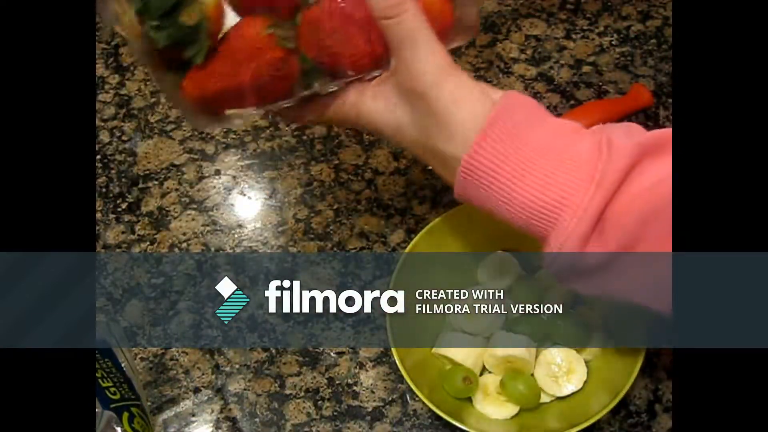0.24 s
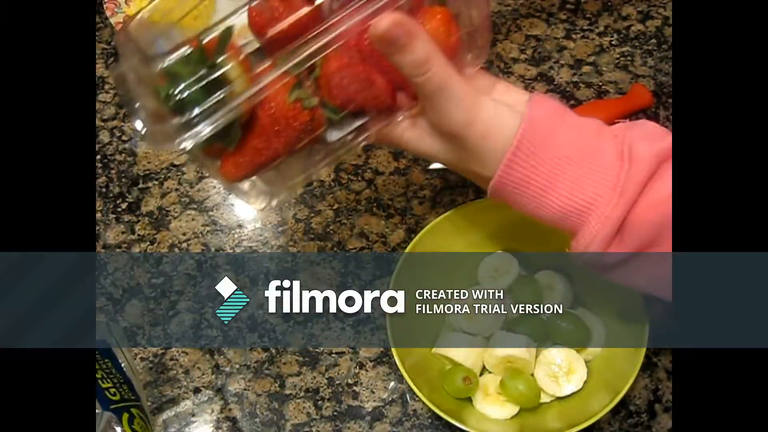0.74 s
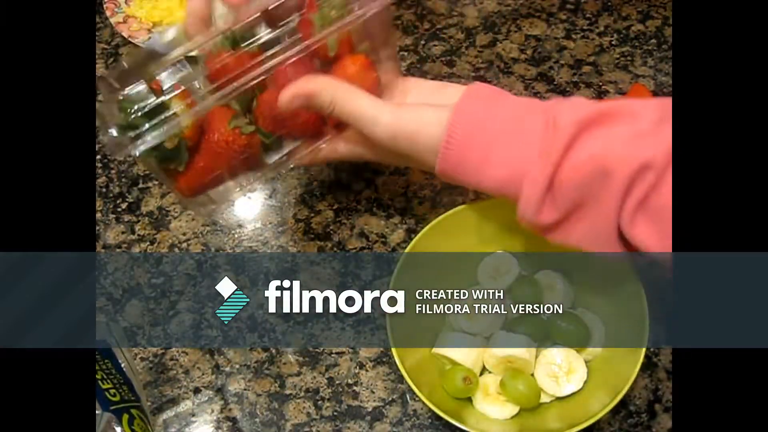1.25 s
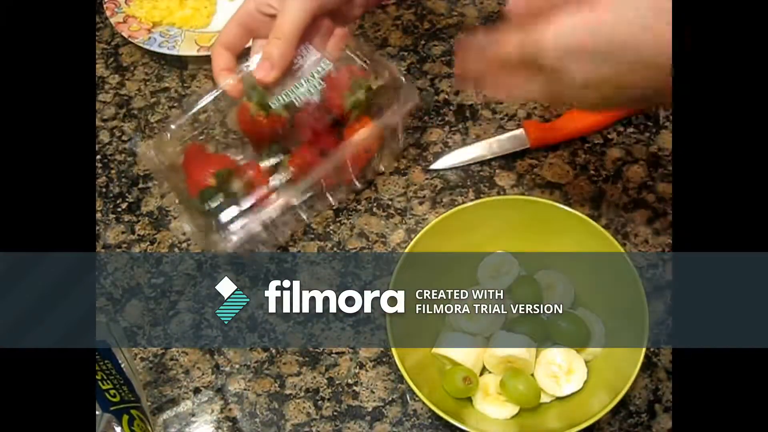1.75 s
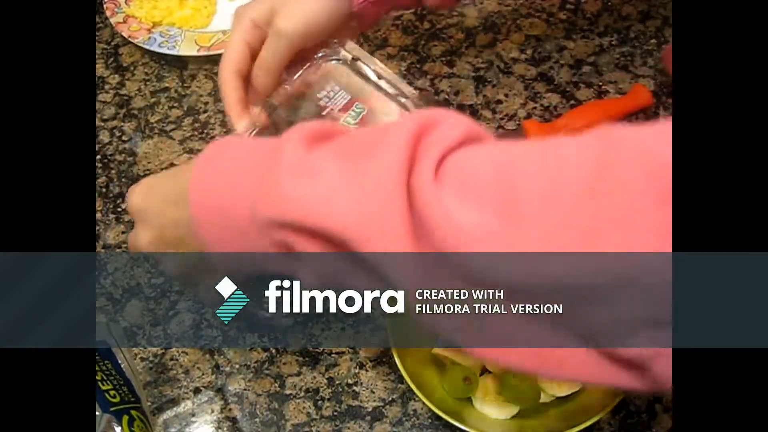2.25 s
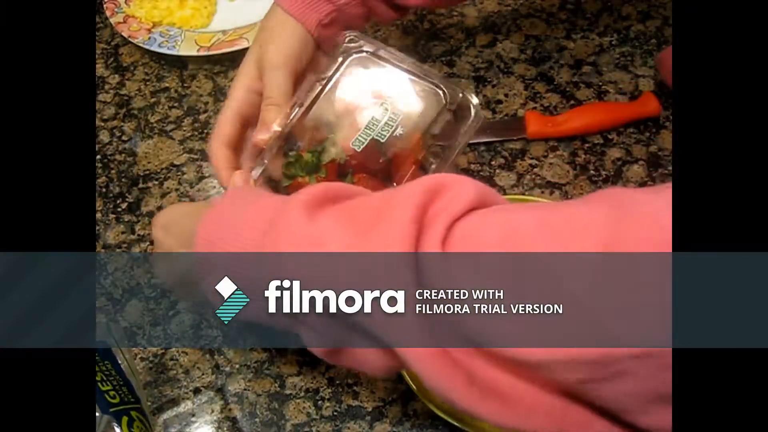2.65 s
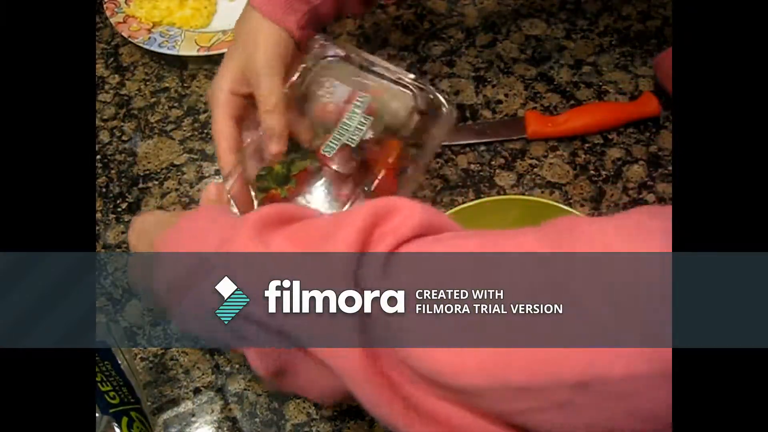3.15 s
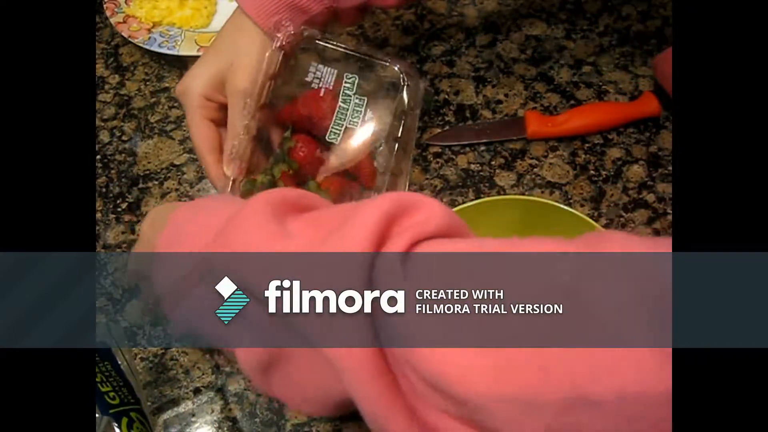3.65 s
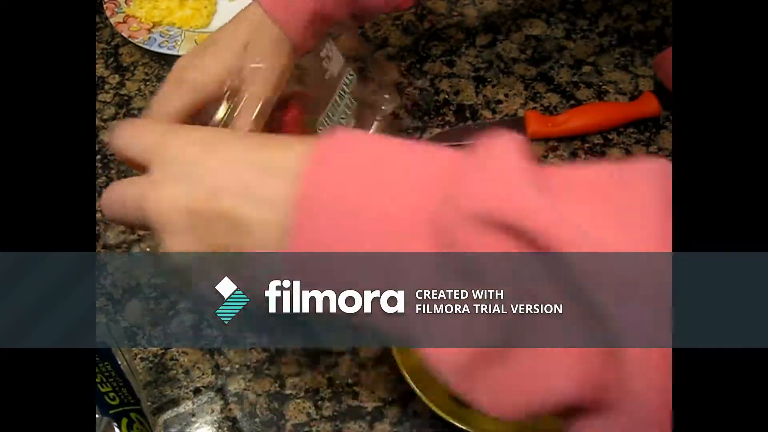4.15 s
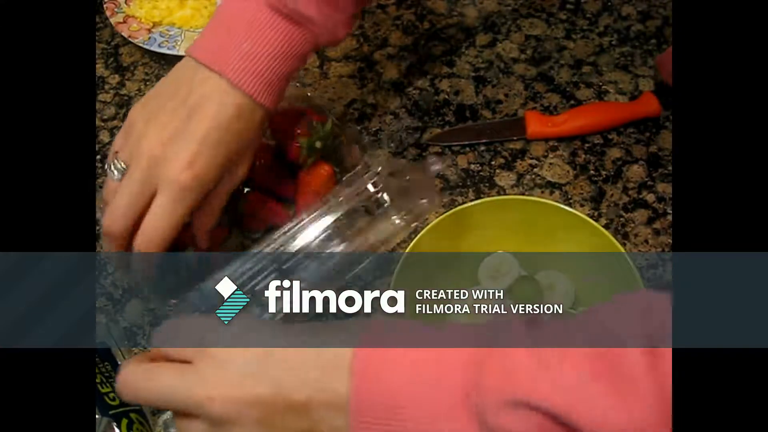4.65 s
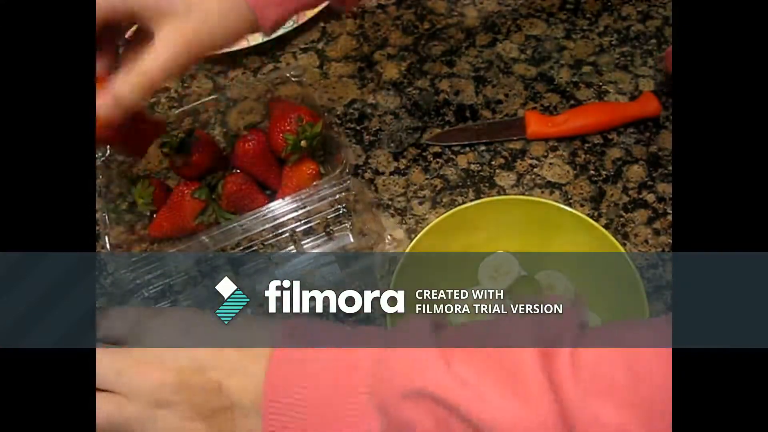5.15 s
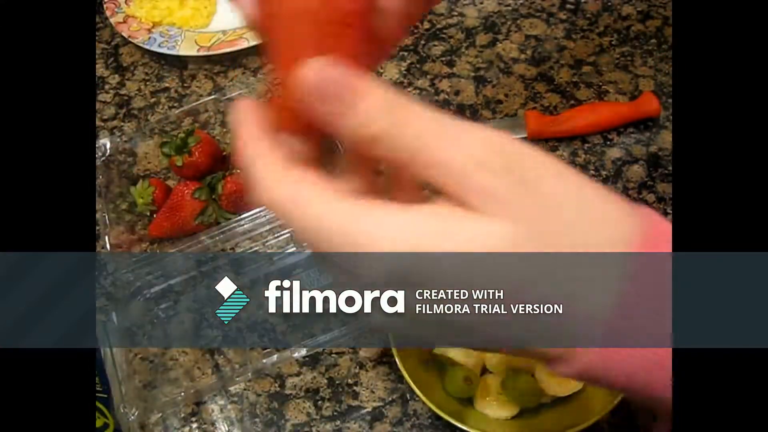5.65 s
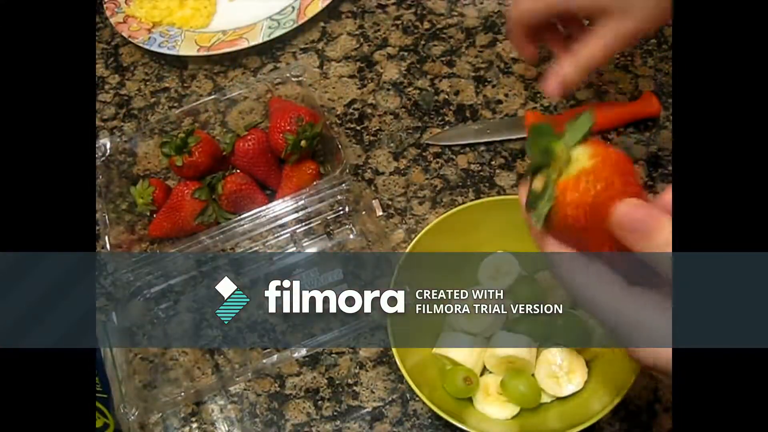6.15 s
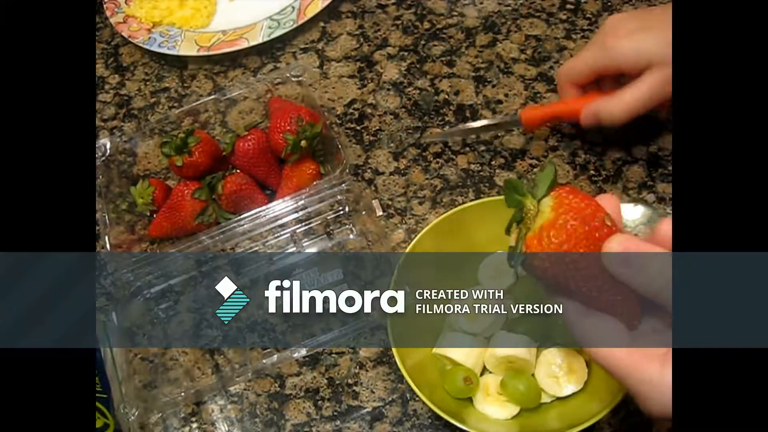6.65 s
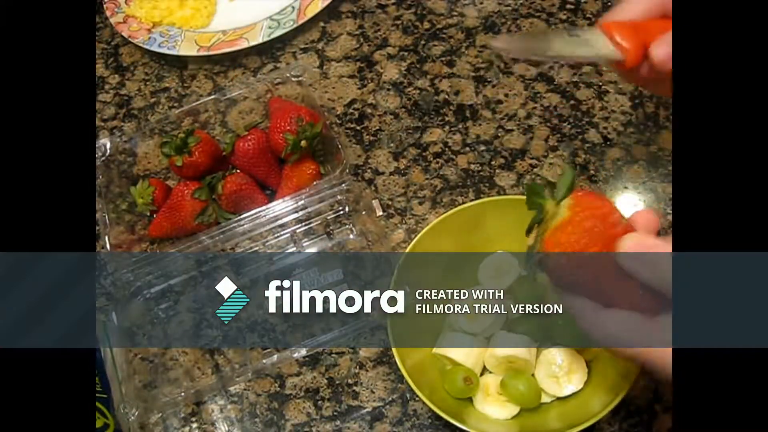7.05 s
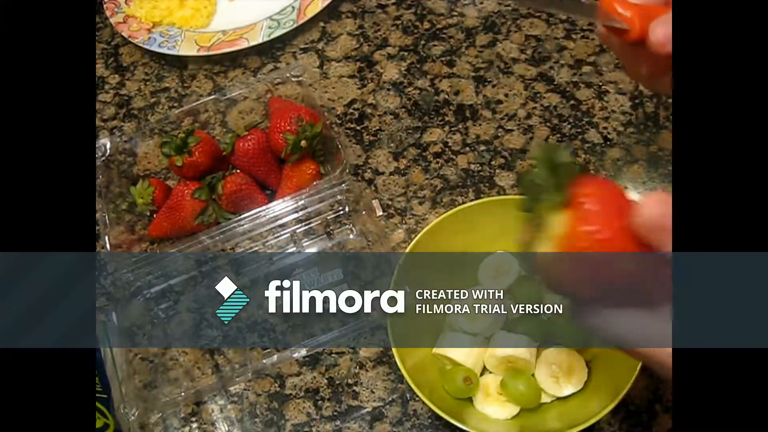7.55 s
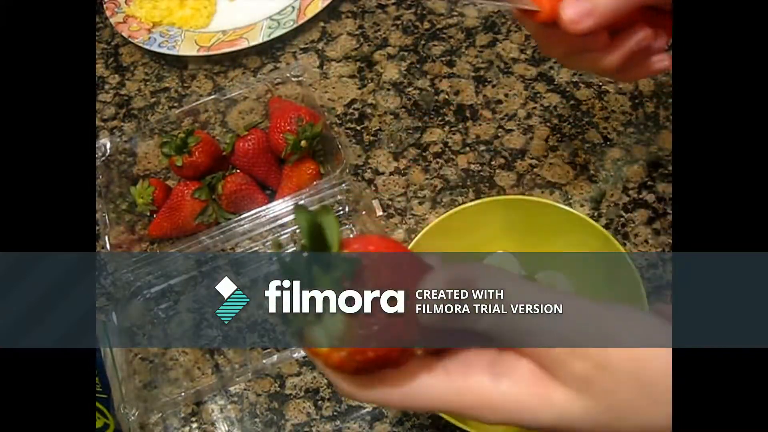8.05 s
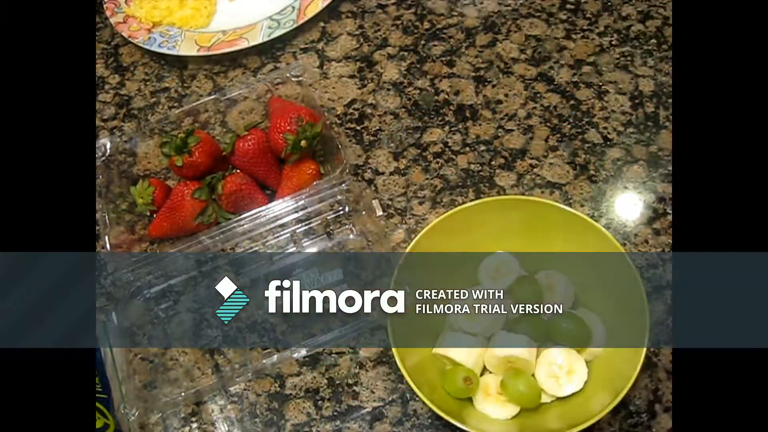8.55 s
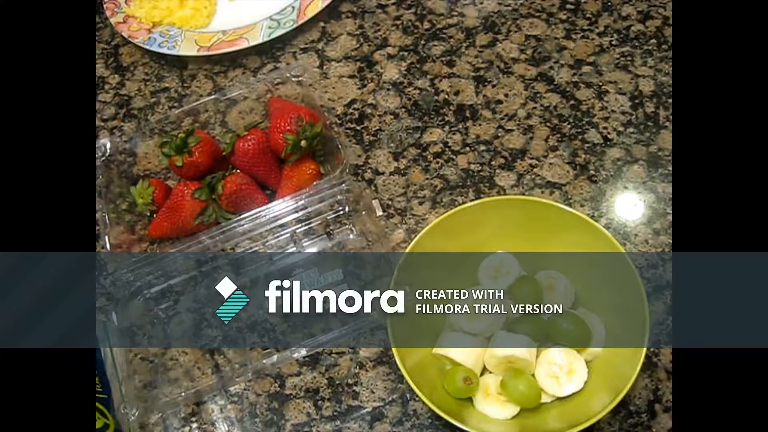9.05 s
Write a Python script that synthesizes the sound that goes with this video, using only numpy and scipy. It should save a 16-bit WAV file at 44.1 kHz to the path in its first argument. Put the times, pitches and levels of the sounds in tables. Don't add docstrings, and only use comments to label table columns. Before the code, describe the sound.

Hands work a brittle plastic fruit container: scattered sharp cracks, a short lull, then dense crunching, creaks and skin rasp building to the loudest pops as it opens. Lighter crackling fades, something hollow knocks on stone, a knife clicks, a sleeve brushes. Close, dry recording in a kitchen with soft room noise, slight hiss and thin motor whine.

```python
import sys
import numpy as np
from scipy import signal
from scipy.fft import rfft, irfft, next_fast_len
from scipy.io import wavfile
from scipy.ndimage import uniform_filter1d, map_coordinates

SR = 44100
rng = np.random.default_rng(int(sys.argv[2]) if len(sys.argv) > 2 else 0)


def ratio_of_db(decibels):
    return 10 ** (np.asarray(decibels, float) / 20)


def put_to_file(sound):
    columns = np.atleast_2d(sound).T
    safe = np.clip(columns, -1, 1)
    whole_steps = np.round(safe * 32767)
    wavfile.write(sys.argv[1], SR, whole_steps.astype(np.int16))


N = 410120


def unit(x):
    return x / np.sqrt(np.mean(x ** 2, axis=-1, keepdims=True) + 1e-20)


def along(points, hz):
    f, v = np.transpose(points)
    return np.interp(np.log(hz + 1), np.log(f + 1), v)


def curves(rows):
    s, *columns = np.transpose(rows)
    return [np.interp(np.arange(N) / SR, s, column) for column in columns]


def wobble(rate):
    knots = rng.standard_normal(int(N * rate / SR) + 4)
    return map_coordinates(knots, [np.arange(N) * rate / SR])


def filtered(x, response):
    size = next_fast_len(x.shape[-1] + 4096)
    spectrum = rfft(x, size) * response(np.fft.rfftfreq(size, 1 / SR))
    return irfft(spectrum, size)[..., :x.shape[-1]]


def coloured(x, spectrum):
    return unit(filtered(x, lambda hz: ratio_of_db(along(spectrum, hz))))


def patchy(patchy_db, bins, frames):
    z = signal.stft(rng.standard_normal(N), nperseg=256)[2]
    field = uniform_filter1d(rng.standard_normal(z.shape), size=bins, axis=0)
    field = uniform_filter1d(field, size=frames, axis=1)
    return signal.istft(z * ratio_of_db(patchy_db * field / field.std()), nperseg=256)[1][:N]


def placed(times, rows):
    at = np.round(np.asarray(times) * SR).astype(int)[:, None] + np.arange(rows.shape[1])
    return np.bincount(at.ravel(), rows.ravel(), N + rows.shape[1])[:N]


# pitch_hz, level_db (per Hz)
AIR = [(12, -40), (20, -14), (71, -8.5), (152, -2.5), (262, 1.5), (312, -3.5), (441, 0), (688, -6),
       (1720, -13), (5360, -19.5), (7400, -19), (9620, -43), (16300, -120)]
HISS = [(4880, -36), (8300, -7), (10100, 3.5), (15100, -8), (15900, -4.5)]
# time_s, level_db, pitch_hz
WHINE = [(0, -63.5, 5265), (3, -63.5, 5265), (5.2, -64, 5260), (6.3, -63, 5270), (6.78, -63, 5262),
         (6.84, -73, 5300), (7.3, -72, 5290), (7.5, -67, 5265), (7.78, -62.5, 5265), (9.3, -61.5, 5264)]
# pitch_ratio (multiple of the whine), level_db (rel)
PARTIALS = [(1, 0), (.3288, -9), (.5316, -12), (.924, -11), (.9745, -13), (1.043, -14)]
# pitch_hz, level_db
HUM = [(143, -68), (269, -70)]


def kitchen():
    def line(hz, db, drift_hz):
        phase = 2 * np.pi * np.cumsum(hz + drift_hz * wobble(16)) / SR
        return ratio_of_db(db + 5.5) * np.sin(phase)

    motor_db, motor_hz = curves(WHINE)
    whine = sum(line(k * motor_hz, motor_db + db + 1.5 * wobble(30), 2) for k, db in PARTIALS)
    hum = sum(line(hz, db + 2.5 * wobble(4), 9) for hz, db in HUM)
    air = ratio_of_db(-50.5 + 0.15 * wobble(2.4)) * coloured(patchy(0.79, bins=3, frames=20), AIR)
    hiss = ratio_of_db(-61.5 + 1.1 * wobble(4.6)) * coloured(rng.standard_normal(N), HISS)
    return air + hiss + whine + hum


def slips(rate, spread_db, t60):
    starts = (rng.random(N) < rate / SR) * ratio_of_db(2 * spread_db * rng.exponential(size=N))
    power = signal.lfilter([1], [1, -ratio_of_db(-120 / (t60 * SR))], starts)
    return np.sqrt(power / np.mean(starts) / (t60 * SR) * 14 + 0.88)


def pricks(strength, rate, spread_db):
    draw = rng.random((int(rate * N / SR), 3))
    s = draw[:, 0] * (N - 1) / SR
    size = -np.log(1 - draw[:, 1:2])
    hz = 2000 * 6 ** draw[:, 2:] ** 1.49
    t = np.arange(256) / SR
    ticks = ratio_of_db(spread_db * np.minimum(size, 3)) * np.sin(2 * np.pi * hz * t) * np.exp(-t * hz / 3.4)
    return placed(s, strength[(s * SR).astype(int), None] * ticks)


def strokes(table, rise, roundness, t):
    panel_under_db, panel_grows = -4.5, 1.4
    s, db, fall, body_db, fizz_db = np.transpose(table)
    late = (t - s[:, None]) / np.abs(fall[:, None])
    shape = ratio_of_db(-20 * np.maximum(late, -late / rise) ** roundness)
    parts_db = db + [panel_under_db + panel_grows * body_db, body_db, 0 * db, fizz_db]
    return ratio_of_db(2 * parts_db) @ shape


# pitch_hz, level_db (per Hz)
PANEL = [(90, -90), (170, -38), (400, -6.5), (800, -5), (1100, 1.5), (1500, 0), (1950, -19), (3300, -120)]
WALL = [(900, -13), (1450, -14), (1750, -5.5), (1880, -6.5), (2020, -4.5), (2200, -6), (2380, -6),
        (3000, -10.5), (3900, -23.5), (6600, -120)]
RASP = [(1200, -79), (2500, -10), (3000, -9.5), (3350, -6.5), (4700, -8), (5450, -8), (7400, -13),
        (9600, -27), (16300, -120)]
FIZZ = [(7000, -32), (8000, 5.5), (10000, 6.5), (12500, 4.5), (15500, 3.5), (17200, -47), (18000, -58.5)]
# peak_s, rasp_db, fall_s (per 10 dB), body_db (rel), fizz_db (rel)
JERKS = [(0.385, -43.5, 0.08, 0, -2.5), (0.6, -45, 0.43, -4, -14), (0.666, -43, 0.24, -0.5, -4.5),
         (1.615, -38, 0.09, 0.5, -6.5), (1.795, -38, 0.45, -7, -6), (2.442, -36, 0.17, -3, -4.5),
         (2.552, -35.5, 0.05, -3, -4.5), (2.634, -46, 0.1, 6.5, -12), (2.806, -41, 0.14, -7, -2),
         (3.235, -33, 0.21, -6, -9), (3.299, -38, 0.26, 1, -0.5), (3.542, -55, 1, 2.5, -8),
         (3.652, -35, 0.04, -11, 2.5), (3.757, -34.5, 0.14, -1, -8), (4.462, -33.5, 0.34, -8.5, -6.5),
         (5.314, -49.5, 0.15, 1, -5), (6.551, -55.5, 0.4, -9, -9), (7.575, -51.5, 0.18, -0.5, -5),
         (7.94, -58.5, -0.05, -6, 7.5), (8.325, -58.5, 0.5, 2, -5.5), (8.91, -55, 0.05, 3, -5)]
SWEEPS = [(0.132, -50, 1, 2, -3.5), (0.99, -35.5, -0.025, -2.5, -3), (1.178, -44, 0.02, 3.5, -8),
          (1.9, -47.5, 1, -10, -10), (1.39, -45, 0.14, -3.5, -2.5), (1.96, -38, 0.03, -7.5, 0.5),
          (2.255, -37, 0.15, -1.3, -8), (2.14, -50.5, 0.27, 2, -18), (2.36, -36, 0, -13, -4),
          (2.95, -38, 0.05, -5.5, -2), (3.434, -51, 0.37, 1.5, -22), (3.885, -32.5, 0.1977, 1, -12),
          (4.168, -23.5, 0.1147, -8, -16), (4.81, -35.5, 0.2771, -7.5, -5.5), (4.95, -40, 0, -6, -3),
          (5.017, -32, 0.04, -2.5, -14), (5.192, -54, 0.07, -1, -14), (5.986, -58.5, 0.3, -3, -0.5),
          (7.685, -47.5, 0.14, -6, -16), (3.12, -47, 0.1, -4, -4.5), (3.2, -41.5, 0.1, -8, -6),
          (9.11, -57.5, 0.8, -6.5, -3.5)]
IDLE_DB = [-63.5, -67.5, -61, -67]


def rubbing():
    t = np.arange(0, N, 64) / SR
    power = strokes(JERKS, rise=0.11, roundness=1.16, t=t)
    power = power + strokes(SWEEPS, rise=0.65, roundness=1.36, t=t)
    power = power + ratio_of_db(2 * np.array(IDLE_DB))[:, None]
    panel, wall, rasp, fizz = curves(np.transpose([t, *np.sqrt(power)]))
    grain = slips(260, spread_db=-4.5, t60=0.047)
    ticks = ratio_of_db(1.0) * pricks(rasp, 180, spread_db=3.5)
    panel = panel * coloured(grain ** 0.63 * patchy(3.6, bins=2, frames=7), PANEL)
    wall = wall * coloured(grain ** 0.62 * patchy(2.4, bins=2, frames=5), WALL)
    rasp = 0.94 * rasp * coloured(grain ** 0.84 * patchy(1.1, bins=3, frames=5), RASP)
    fizz = fizz * coloured(grain ** 1.2 * patchy(1.8, bins=6, frames=4), FIZZ)
    return filtered(panel + wall + rasp + fizz + ticks, lambda hz: hz ** 2 / (hz ** 2 + 170 ** 2))


def snaps(table):
    s, db, panel_db, wall_db, fizz_db, hz = np.transpose(table)[:, :, None]
    t = np.arange(3072) / SR
    noise = rng.standard_normal((4, len(s), len(t)))
    t60 = 0.018 * ratio_of_db(-0.12 * (fizz_db + 12.5))
    crack = 1.9 * ratio_of_db(-60 * t / 0.004)
    ring_t60 = 1.16 * t60 * np.minimum(1, 2500 / hz)
    ring = np.sin(2 * np.pi * hz * t) * ratio_of_db(-60 * t / ring_t60) * (1 - np.exp(-t / 0.00054))
    burst = ratio_of_db(np.maximum(wall_db, -3) - 1.5) * ring
    # colour, level dB, decay over t60, rise s
    parts = [(PANEL, panel_db + 1.5, 1.6, 0.001), (WALL, wall_db - 1.0, 1.9, 0.0005),
             (RASP, -1.5, 1.2, 0.00025), (FIZZ, fizz_db + 7.0, 0.81, 0.0002)]
    for n, (spectrum, rel_db, slow, rise) in zip(noise, parts):
        part = coloured(n, spectrum) * (ratio_of_db(-60 * t / (slow * t60)) + crack) * (1 - np.exp(-t / rise))
        burst = burst + ratio_of_db(rel_db) * part / np.abs(part).max(axis=1, keepdims=True)
    train = placed(s[:, 0] - 0.0002, ratio_of_db(db + 1.3) * burst)
    return filtered(train, lambda hz: hz ** 4 / (hz ** 4 + 600 ** 4))


# start_s, level_db (peak), body_db (rel), fizz_db (rel), pitch_hz (ring)
CREASED = [(0.549, -27, -5, -7, 3000), (0.87, -43, -4, -16, 2000), (1.204, -38, -1, -12, 1900),
           (2.4025, -24, -11, -8, 5380), (2.906, -30, -10, -12, 3440), (2.927, -27, -13, -9, 4320),
           (3.428, -19, -10, -11, 5800), (3.496, -34, -15.5, -18, 4040), (4.488, -26, -10, -18, 4840),
           (4.988, -22, -7, -14, 2900), (5.037, -22, -10, -18, 4500), (5.283, -31, 1, -12, 2140),
           (6.5495, -30, -20, -1, 6000), (6.583, -40, -15, -4, 5500), (0.0432, -36, -10, -7, 2800),
           (0.0607, -44, -6, -8, 2190), (0.0826, -35, -10, -7, 3150), (0.2128, -34, -10, -10, 3760),
           (0.93, -36, -10, -3, 2970), (1.1717, -33, 0, -12, 2500), (1.558, -37, -3, -12, 2350),
           (1.86, -30, -20, 1.5, 10500), (2.045, -37, -14, -6, 10500), (2.67, -40, -24, -4, 6300),
           (4.5835, -22, -10, -14, 3300), (4.758, -26, -16, -14, 3580), (4.8878, -22, -16, -11, 4910),
           (5.053, -39, -20, -4, 6000), (4.52, -24, -16, -14, 4820)]
TURNED = [(0.112, -31, 3.5, -18, 2280), (0.164, -27, -1.5, -14, 1750), (0.2513, -30, 0, -17, 1660),
          (0.368, -37.5, 11, -17, 1690), (0.383, -28, -13.5, -0.5, 2130), (0.467, -28.5, -13, -8, 1740),
          (0.535, -14.5, -4.5, -8, 5340), (0.5892, -8, -9.5, -9.5, 5600), (0.6522, -11.5, -4.5, -6, 3350),
          (0.7294, -39, 3, -28, 1200), (0.769, -33, 0, -28, 1240), (0.9368, -27, -8, -16, 4500),
          (1.0236, -36, 6, -7, 2010), (1.1287, -36, 0.5, -7, 2440), (1.103, -34.5, -4, -9, 2600)]
NUDGED = [(0.128, -35, -1, -9, 1400), (0.139, -30, -4.5, -14, 1480), (0.289, -34, -3.5, -7, 2350),
          (4.8447, -16, -21.5, -14, 4440), (4.9734, -14, -21, -10.5, 4940), (5.3097, -21, -10, -12, 4800),
          (5.432, -33, -7.5, -15, 1870)]
GRIPPED = [(1.6077, -18, -2, -11, 1980), (1.6345, -21.5, -8, -21, 2030), (1.6828, -32.5, 3.5, -11, 2160),
           (1.8167, -28, -17, -24, 3330), (1.8522, -17, -8.5, -3, 2950), (1.8724, -19, -6, -8, 4120),
           (1.9045, -18.5, -11, -8, 3270), (1.969, -22.5, -8, -14, 1900), (2.148, -30, -16, -1, 5200),
           (2.1589, -19, -10, -14, 3280), (2.3038, -17.5, -6, -21, 1720), (2.321, -15.5, -11, -10, 4070),
           (2.4303, -11, -8.5, -7.5, 2920), (2.4467, -27, 2, -2, 6200), (2.535, -23, -7, -9, 2650),
           (2.5453, -17, -7.5, -8, 3320), (2.557, -18, -16, -16, 5700), (2.565, -25, -20, -16, 2700),
           (2.5809, -16.5, -5.5, -20, 2470), (2.6199, -19.5, 10, -16, 2010),
           (2.801, -19.5, -15, -8.5, 5300)]
PRISED = [(3.229, -15.5, -12, -22, 3300), (3.2535, -15.5, -7, -1, 5500), (3.2808, -6, -6.5, -5, 2050),
          (3.321, -17, 2, -2.5, 2620), (3.358, -18, -7, -18, 2880), (3.3652, -14, -3.5, -12, 2220),
          (3.4402, -17.5, -3, -6.5, 2510), (3.5313, -14, -9, -4.5, 2400), (3.5937, -16.5, -8, -1.5, 2320),
          (3.6008, -16, -2.5, -12, 1760), (3.6393, -9.5, -6.5, -4.5, 3880), (3.7448, -13, -3, -1, 5360),
          (3.7479, -0.5, -4.5, -15, 3330), (3.809, -2, -3.5, -19, 3270), (4.0245, -18, -3.5, -16, 1900),
          (4.0445, -17.5, -2, -12, 2660), (4.0942, 1.5, -11, -19, 3650), (4.325, -16.5, -6.5, -4.5, 3860)]
FOLDED = [(4.458, -29.5, -1.5, -28, 3580), (4.609, -15, -25, -10, 4370), (4.6703, -21.5, -13, -23, 3630),
          (4.928, -15, -15, -13, 4660), (5.006, -9, -17.5, -15.5, 4460), (5.0185, -20, -8, -12, 3730),
          (5.1465, -28.5, -5, -14, 2740), (5.181, -46.5, 18, -25, 2070), (5.2754, -30.5, 5, -15, 2250)]
TICKED = [(6.5422, -18, -14, -9, 6800), (6.5452, -23, -10, -3, 5270), (6.558, -22, -21, -3, 6340),
          (7.5618, -37, -4, -9, 5000), (7.983, -49, -12, 7, 12500), (8.3094, -35, -1, -7, 1720)]
FREE_DB = [-8.5, -12, -15, -11, 5.5, -20, -13]


def buckles():
    actions = [TURNED, GRIPPED, PRISED, FOLDED, NUDGED, TICKED, CREASED]
    rows = []
    for action, free_db in zip(actions, FREE_DB):
        rows += [(s, db, body + free_db, body, fizz, hz) for s, db, body, fizz, hz in action]
    return snaps(rows)


# start_s, level_db, pitch_hz, fade_cycles (to 1/e)
KICKS = [(0.5353, -17, 5550, 12), (0.6525, -19, 5600, 10), (1.8522, -14, 9000, 1.6),
         (2.4307, -5, 2950, 2.5), (2.4468, -27, 1000, 4), (3.2810, -5, 6500, 1.6), (3.5315, -7, 6000, 1.6),
         (3.594, -10, 10500, 3), (3.6395, -5, 10500, 3), (4.9733, -18, 12000, 2), (6.5424, -9, 11200, 4),
         (6.5424, -13, 16300, 8), (6.667, -39, 13000, 2), (7.098, -45, 3400, 10)]


def kicks():
    s, db, hz, cycles = np.transpose(KICKS)[:, :, None]
    t = np.arange(768) / SR
    swing = np.sin(2 * np.pi * hz * t) * np.exp(-t * hz / np.maximum(cycles, 0.5))
    return placed(s[:, 0], ratio_of_db(db) * swing)


# start_s, level_db, pitch_hz, width_hz, t60_s
BRUSHES = [(7.93, -53, 13500, 6000, .3), (7.95, -60, 15000, 3000, .2), (8.0, -62, 13000, 6000, .2),
           (5.865, -54, 12000, 6000, .3), (5.975, -50, 12000, 7000, .2), (6.153, -51, 12000, 4000, .14),
           (5.56, -59, 13500, 5000, .1), (5.588, -58, 13500, 5000, .1), (5.29, -46, 13000, 3000, .06),
           (3.8, -29, 2500, 900, 0.4), (3.87, -27.5, 3100, 1300, 0.27), (1.83, -35.5, 3170, 900, .5),
           (1.92, -34, 3300, 1300, .5), (0.727, -29, 1900, 2200, 0.07), (0.592, -37, 4800, 1500, 0.15),
           (0.761, -28, 2600, 4000, 0.06), (4.1, -25, 3680, 1300, 0.75), (7.63, -46.5, 3900, 2900, 0.7),
           (7.66, -45.5, 3700, 2500, 0.52), (7.09, -60, 13000, 7000, .2), (9.08, -59, 14500, 4000, .3),
           (6.75, -62, 13000, 7000, .2), (6.597, -43, 2670, 300, .07), (6.565, -48, 2900, 400, .15)]
CREAKS = [(2.156, -31, 2000, 400, 0.1), (2.182, -32, 2150, 400, .08), (2.207, -31, 1900, 500, .12),
          (2.232, -21.5, 2000, 500, 0.1), (2.247, -23, 2100, 400, .07), (2.267, -15.5, 2000, 352, 0.046),
          (2.299, -18.5, 1850, 540, 0.072), (2.53, -33, 2600, 400, 0.098), (2.579, -24.5, 2580, 350, 0.068),
          (2.618, -10.5, 2140, 450, 0.033), (3.356, -25, 3480, 600, 0.12), (3.362, -23, 2250, 500, 0.084),
          (3.359, -23, 5850, 1300, .12), (3.42, -24, 2500, 500, 0.072), (3.419, -23, 5600, 1200, 0.074),
          (3.917, -24, 1800, 600, 0.054), (4.04, -13, 2660, 400, 0.045), (4.04, -24, 5300, 1500, 0.046),
          (4.054, -25, 1220, 350, 0.066), (4.772, -27, 1130, 231.5, 0.078), (4.812, -30, 860, 300, 0.062),
          (5.31, -26.5, 1150, 450, 0.079), (5.436, -39, 1050, 400, 0.087), (8.31, -43, 1700, 800, 0.28),
          (8.862, -35.5, 520, 700, 0.16), (9.0, -42.5, 1019, 900, 0.14), (8.908, -44, 2700, 900, .04)]


def creaks():
    s, db, hz, width_hz, t60 = np.transpose(CREAKS + BRUSHES)[:, :, None]
    t = np.arange(12288) / SR

    def mode(f):
        return (f * width_hz / (hz ** 2 - f ** 2 + 1j * f * width_hz)) ** 2

    band = unit(filtered(rng.standard_normal((len(s), len(t))), mode))
    return placed(s[:, 0], ratio_of_db(db - 60 * t / t60) * (1 - np.exp(-t / 0.0071)) * band)


# start_s, level_db (peak), body_db (rel), fizz_db
# (rel), pitch_hz (ring)
DRY_SNAPS = [(0.694, -30, -4, -14, 2900), (2.101, -33, 3, -20, 1900), (2.5412, -21, -8, -12, 4500),
             (3.2848, -18, -10, -12, 5500), (3.647, -26, -20, 4, 10500), (3.6545, -26, -10, -4, 5200),
             (4.086, -28, -6, -18, 2800), (4.861, -26, -6, -12, 3000), (5.0095, -17, -16, -14, 5000),
             (5.0155, -23, -12, -12, 6500), (5.0225, -17, -8, -24, 4200), (5.2965, -32, -10, -8, 6000),
             (5.3154, -29, -1, -16, 2600)]


def further_snaps():
    return snaps([(s, db, body - 10, body, fizz, hz) for s, db, body, fizz, hz in DRY_SNAPS])


# start_s, level_db (peak), pitch_hz, t60_s, push (0-1)
THUDS = [(2.62, -27.5, 210, 0.056, 0), (2.938, -31, 560, 0.069, 0.2), (3.435, -31, 370, 0.066, 0),
         (3.24, -32.5, 264, 0.091, 0.3), (3.747, -22.5, 533, 0.018, 1), (3.888, -16.5, 402, 0.026, .02),
         (4.096, -12, 330, 0.012, 0.6), (8.863, -32, 398, 0.07, 0.2), (5.753, -35, 210, .05, 0)]


def thuds():
    s, db, hz, t60, push = np.transpose(THUDS)[:, :, None]
    t = np.arange(6144) / SR
    jolt = push * (1 - t / 0.0022) * t / 0.0006 * np.exp(1 - t / 0.0006)
    ring = np.sin(2 * np.pi * hz * t) * ratio_of_db(-60 * t / t60) * (1 - np.exp(-t / 0.0008))
    return placed(s[:, 0], ratio_of_db(db - 3.0) * (jolt + ring))


# start_s, level_db
KNOCK = [
    (5.7513, -25),
    (5.7543, -11),
    (5.7600, -18),
    (5.7659, -15.5),
    (5.7825, -35),
]
# pitch_hz, level_db, t60_s
HOLLOW = [(583, -10.5, 0.11), (630, 9, 0.036), (800, 8, 0.021), (1230, -4, 0.045), (1400, 0, 0.03)]


def knock():
    s, db = np.transpose(KNOCK)[:, :, None]
    t = np.arange(6144) / SR
    ring = sum(ratio_of_db(level - 60 * t / t60) * np.sin(2 * np.pi * hz * t) for hz, level, t60 in HOLLOW)
    soft_start = 1 - np.exp(-(t / 0.0009) ** 2)
    blows = placed(s[:, 0], ratio_of_db(db - 6) * ring * soft_start)
    return filtered(blows, lambda hz: hz ** 2 / (hz ** 2 + 300 ** 2) / (1 + (hz / 1850) ** 8))


# pitch_hz, t60_s
KITCHEN = [(200, 0.082), (3000, 0.096), (10000, 0.27)]


def walls(x):
    hz, t, z = signal.stft(rng.standard_normal(SR // 2), SR, nperseg=256)
    tail = signal.istft(z * ratio_of_db(-60 * t / along(KITCHEN, hz)[:, None]), SR, nperseg=256)[1]
    delayed = np.pad(x, (200, 0))
    return signal.fftconvolve(delayed, tail / np.linalg.norm(tail))[:N]


def scene():
    steady = kitchen() + rubbing()
    hits = buckles() + kicks() + creaks() + thuds() + knock()
    echo = ratio_of_db(-12) * walls(hits)
    return (hits + echo + steady + further_snaps())[None]


def top_cut(x):
    return signal.sosfilt(signal.butter(12, 16970, fs=SR, output="sos"), x)


def record(dry):
    def notch(hz):
        return (7900 ** 2 - hz ** 2 + 120j * hz) / (7900 ** 2 - hz ** 2 + 1500j * hz)

    mix = np.clip(filtered(dry, notch), -0.87, 0.87)
    return top_cut(mix)


dry = scene()
out = record(dry)
put_to_file(out)
```